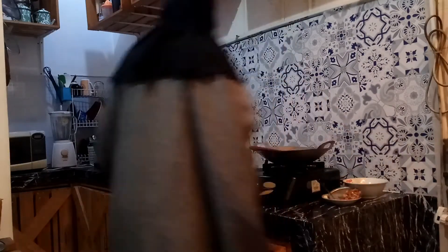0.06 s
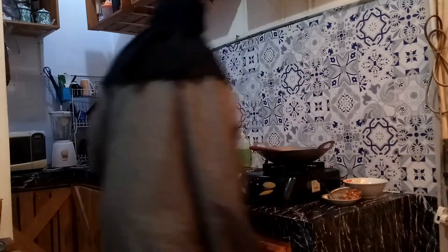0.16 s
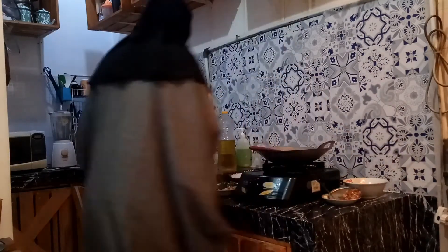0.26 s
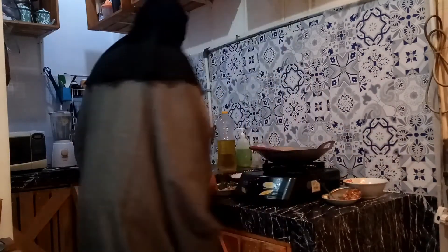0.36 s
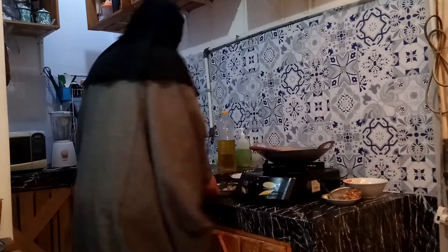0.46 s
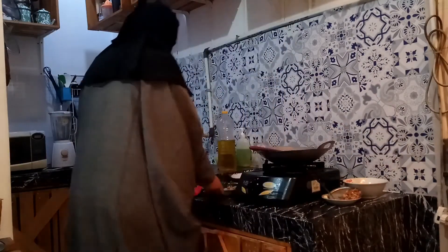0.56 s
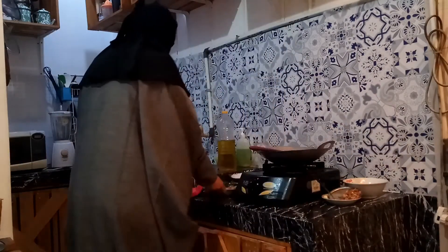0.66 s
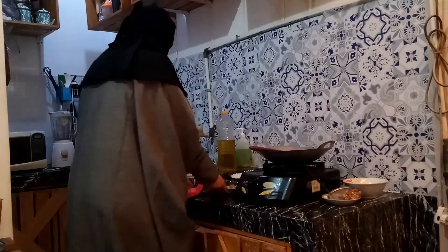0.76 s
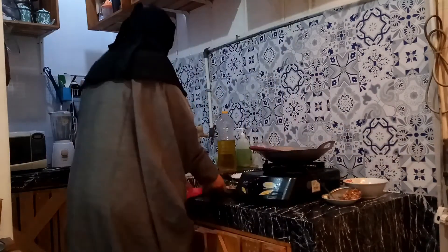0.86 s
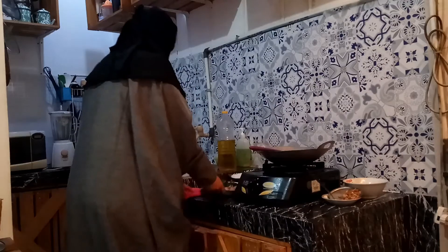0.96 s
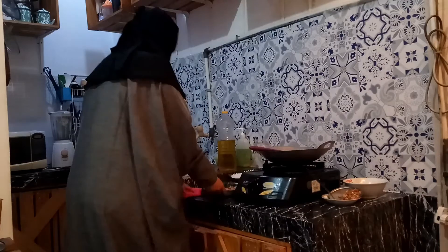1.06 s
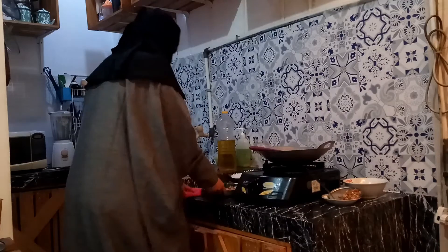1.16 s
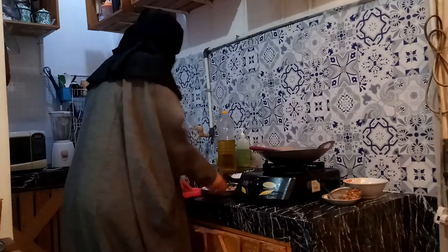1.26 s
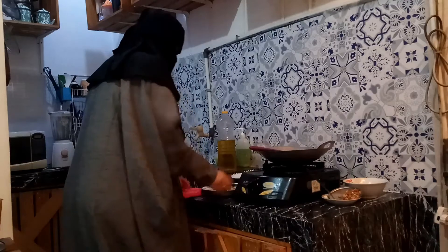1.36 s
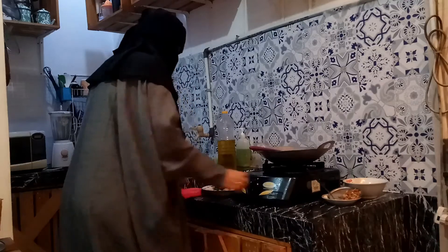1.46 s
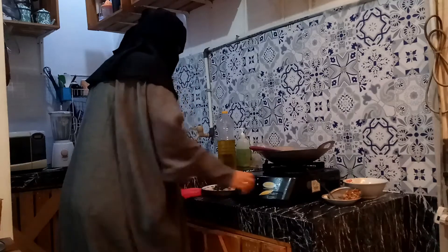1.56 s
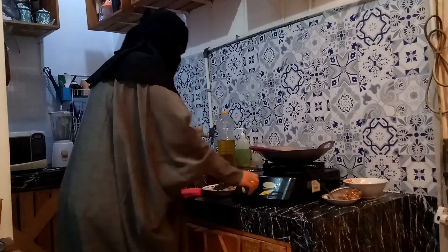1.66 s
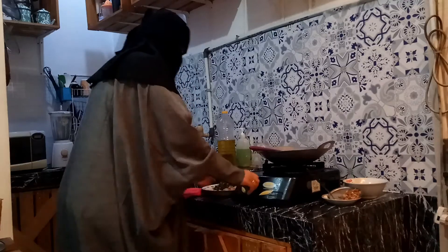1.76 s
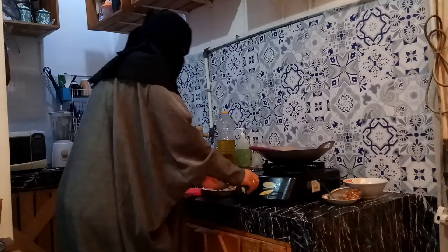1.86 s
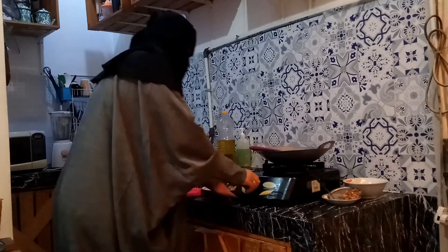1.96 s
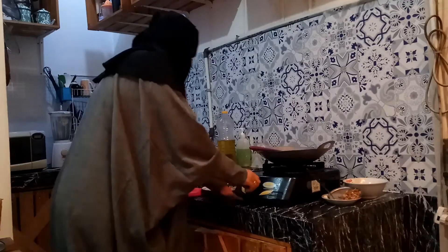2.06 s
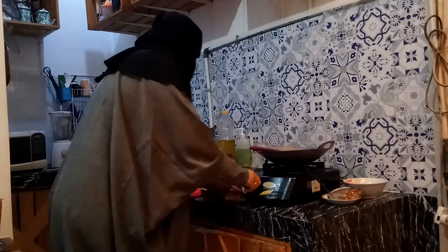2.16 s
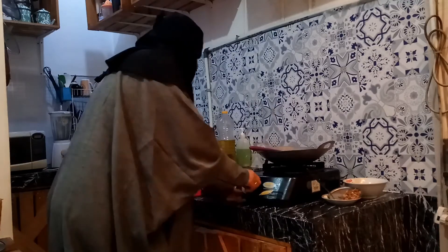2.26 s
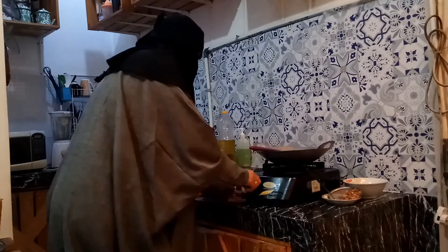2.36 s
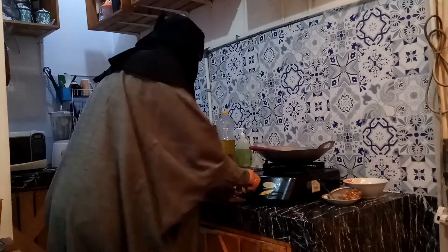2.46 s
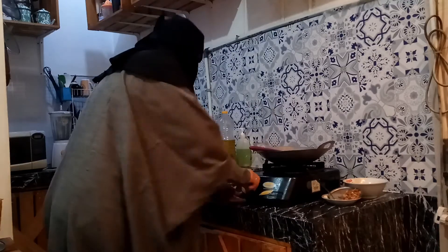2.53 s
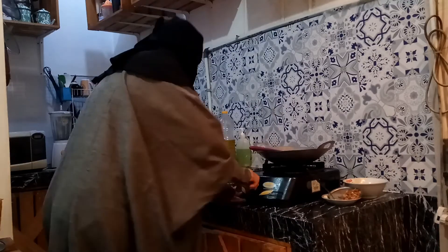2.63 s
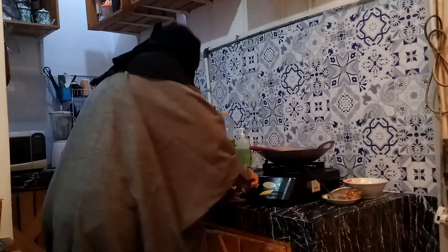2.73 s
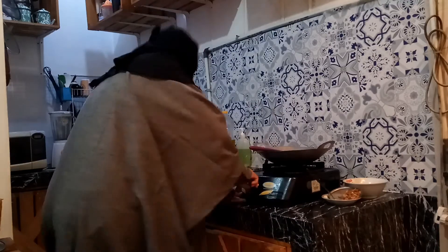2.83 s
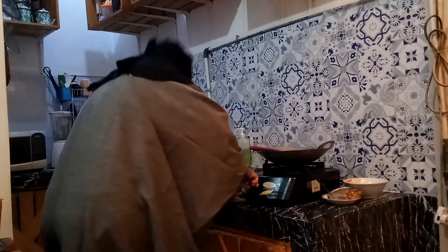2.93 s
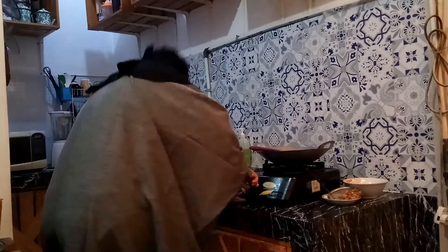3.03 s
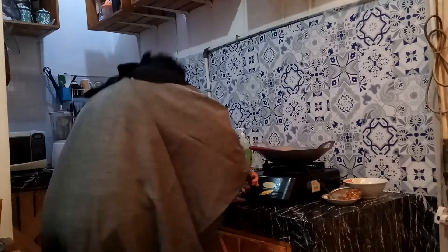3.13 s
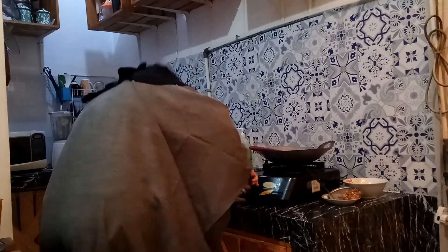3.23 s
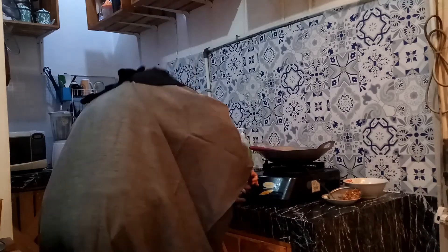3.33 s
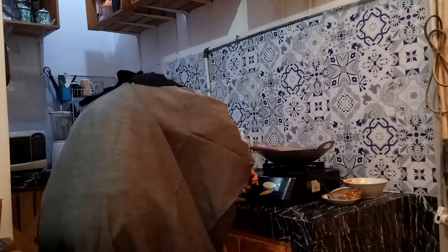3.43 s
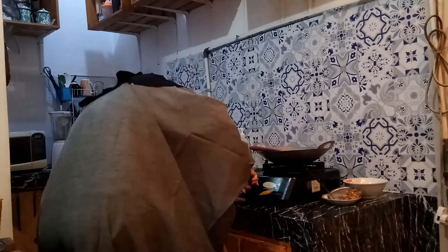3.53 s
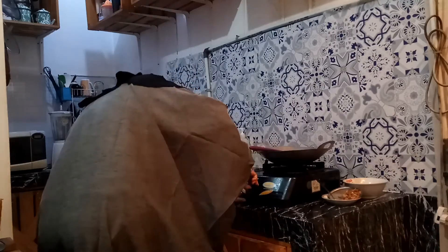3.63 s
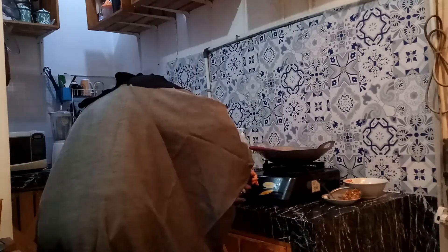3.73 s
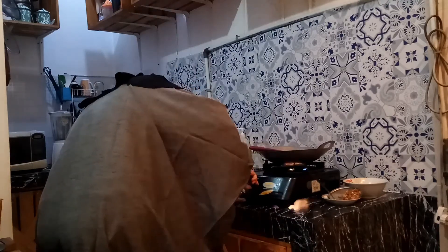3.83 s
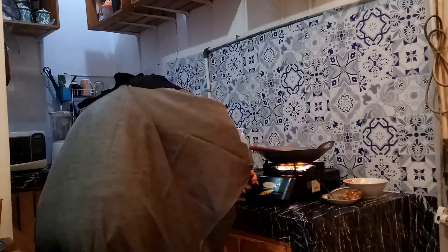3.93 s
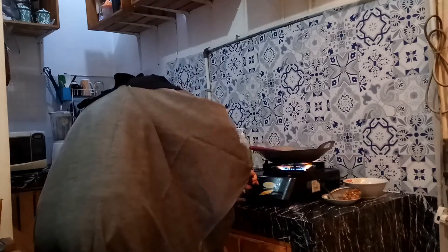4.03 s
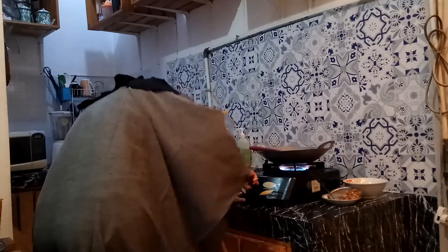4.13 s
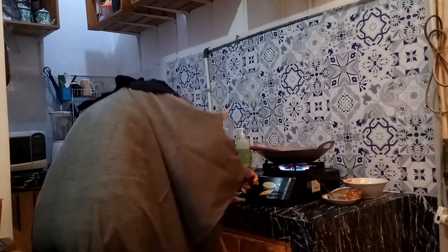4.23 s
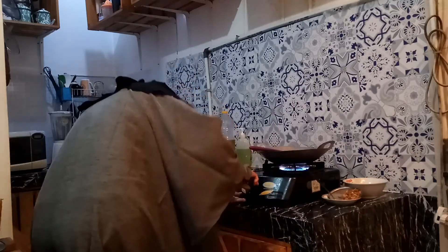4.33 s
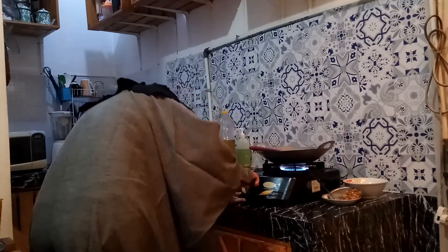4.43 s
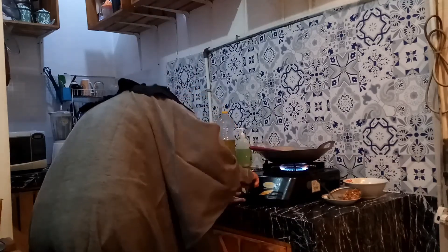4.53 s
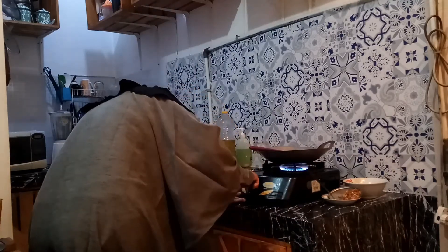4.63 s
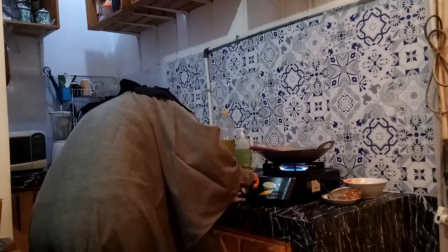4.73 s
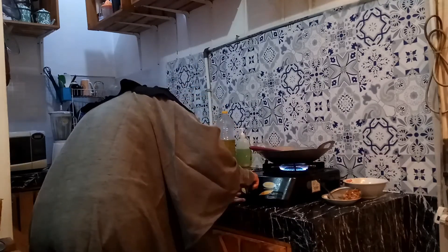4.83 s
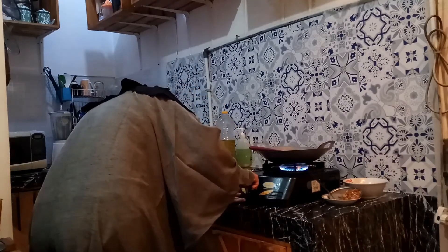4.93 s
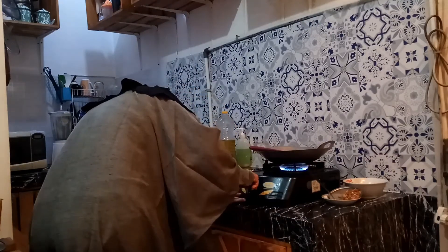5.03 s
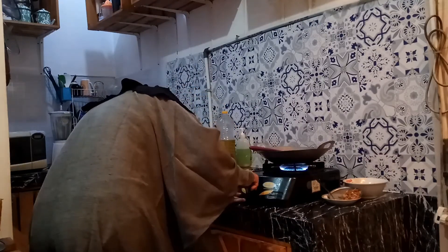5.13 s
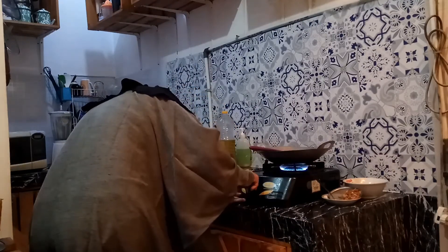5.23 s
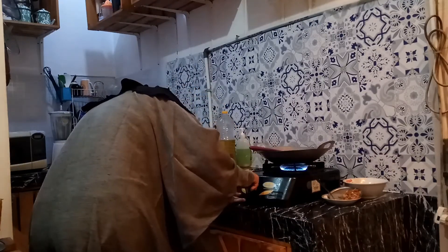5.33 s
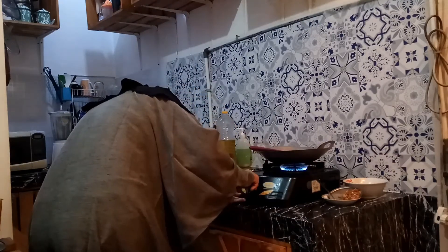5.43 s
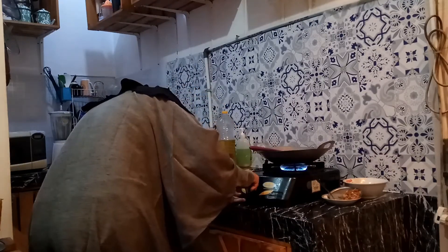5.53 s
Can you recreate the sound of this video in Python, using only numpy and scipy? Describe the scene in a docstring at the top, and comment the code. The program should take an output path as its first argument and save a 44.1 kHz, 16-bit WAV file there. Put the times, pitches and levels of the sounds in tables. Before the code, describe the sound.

In a small tiled kitchen, cloth rustles and a utensil clacks on the counter, then a gas stove igniter snaps loudly and flame puffs alight.

```python
"""A small tiled kitchen, in stereo: a cook steps up to a portable gas stove, cloth rustling as noise strokes.
A utensil clacks on the counter: short force bursts drive resonant bodies.
The knob turns: gas seeps as filtered noise, the igniter snaps, a jet rushes and the flame catches in low puffs.
The knob clicks back and the burner hisses faintly; a thin airy whistle drifts through.
Most of it reaches the two microphones off the tiles, over room rumble, microphone hiss and appliance hum."""
import sys
import numpy as np
from scipy import signal
from scipy.fft import rfft, irfft, next_fast_len
from scipy.io import wavfile
from scipy.ndimage import uniform_filter1d

SR = 44100
rng = np.random.default_rng(int(sys.argv[2]) if len(sys.argv) > 2 else 0)


def put_to_file(sound):
    """Save the sound as 16-bit audio at rate SR, in the file named by the first command-line argument."""
    columns = np.atleast_2d(sound).T  # one column per channel
    safe = np.clip(columns, -1, 1)
    whole_steps = np.round(safe * 32767)
    wavfile.write(sys.argv[1], SR, whole_steps.astype(np.int16))


N = 246166
TIME = np.arange(N) / SR  # s


# Latch slip, then hammer strike and rebounds: t/s, level/dB, contact length/s, brightness f/Hz
IGNITER_SNAPS = [(3.918, -29.5, 0.0016, 6000), (3.9318, 11, 0.0057, 18000), (3.9405, 3, 0.0041, 18000),
                 (3.958, 1.5, 0.011, 12000)]
# Broad colour of the stove when struck: f/Hz, level/dB
STOVE_SPECTRUM = [(80, -31.5), (250, -16.5), (550, -5), (1100, -8), (2300, -3), (3200, -1), (6000, 1),
                  (8500, -2.5), (12500, -7), (16000, -0.5)]


def igniter(ping_hz=14950, ping_width_hz=400, ping_db=-2):
    """The spring hammer hits the spark crystal with a high ping and shakes the steel case."""
    force = contacts(IGNITER_SNAPS, push_s=0.0017)
    case = amp(2.5) * steel_case(force, STOVE_SPECTRUM)
    ping = ring(force, [(ping_hz, ping_width_hz, ping_db)])
    return case + ping


# Sheet-steel resonances: f/Hz, width/Hz, level over the broad colour/dB
STEEL_MODES = [(570, 130, -5.5), (920, 50, 4), (1277, 130, 2.5), (1740, 230, -2), (2870, 300, -1.5),
               (3540, 85, 0), (4100, 300, -4.5), (5810, 64, -11), (6540, 66, -10.5), (10160, 410, -1.5)]
# Narrow notch in everything heard from the steel case: f/Hz, width/Hz, level of the part subtracted/dB
STOVE_NOTCH = [(3700, 100, -3)]


def steel_case(force, spectrum):
    """The stove's sheet steel rings at its modes; one narrow band is weakened."""
    ringing = body(force, spectrum, STEEL_MODES)
    return ringing - ring(ringing, STOVE_NOTCH)


SPARK_S = 3.932  # the jet and the flame are silent until here
# The hiss level drops here; the low burn falls from here, though it is silent until the spark
BURN_FROM_S = 3.7
VALVE_OPEN_S, VALVE_RISE_S = 3.02, 0.13  # the knob is pressed in; rise is the time per 20 dB
UNLIT_HISS_DB, LIT_HISS_DB = -72, -83  # before the common hiss gain
VALVE_FALL_S = 1.1  # fall of each valve whistle, time per 20 dB
# Broad colour of the rushing jet: f/Hz, level/dB
JET_SPECTRUM = [(200, -18.5), (600, -6.5), (1200, -8), (2300, -7), (3000, -3.5), (4500, -1), (6500, -0.5),
                (8500, -7), (12500, -10), (16000, -8.5)]
# Broad colour of the flame: f/Hz, level/dB
FLAME_SPECTRUM = [(30, -19.5), (70, -15.5), (125, -1), (330, -1.5), (480, -3.5), (700, -12), (1000, -17),
                  (3000, -27.5), (16000, -63)]
# Valve whistling while the knob is held in and again as the flame is set:
# t at full level/s, length/s, rise per 20 dB/s, level before the common hiss gain/dB
VALVE_TONES = [(3.116, .85, 2.5, -67), (5.5, .1, 0.9, -62)]
# Narrow resonance of the valve: f/Hz, width/Hz, level/dB
VALVE_RESONANCE = [(7520, 68, 0.0027)]
# Broad resonance of the burner: f/Hz, width/Hz, level/dB
BURNER_RESONANCE = [(5100, 990, -1.5)]


def gas():
    """The jet sputters through the steel burner, the flame catches in low puffs, a thin hiss stays."""
    jet_noise, burn_noise, seep_noise = rng.standard_normal((3, N))
    rush = steel_case(jet_noise * jet_flow() * flutter(350, depth_db=5), JET_SPECTRUM)
    flame = colour(burn_noise * flame_size() * flutter(70, depth_db=-2.0), FLAME_SPECTRUM)

    opening = swell(VALVE_OPEN_S, N / SR, VALVE_RISE_S, VALVE_RISE_S)
    burner_level = amp(np.where(TIME < BURN_FROM_S, UNLIT_HISS_DB, LIT_HISS_DB))
    valve_level = 0
    for s, length_s, rise_s, db in VALVE_TONES:
        valve_level = valve_level + amp(db) * swell(s, length_s, rise_s, VALVE_FALL_S)
    valve = valve_level * ring(seep_noise, VALVE_RESONANCE)
    burner = burner_level * ring(seep_noise, BURNER_RESONANCE)
    hiss = amp(13.5) * opening * (valve + burner)
    return rush + flame + hiss


JET_FULL_S, JET_HOLD_S, JET_DB = 3.997, 0.073, -27.5
JET_RISE_S, JET_FALL_S = 0.095, 0.063  # time per 20 dB
JET_TRAIL_DB, JET_TRAIL_S = -48, 0.26  # last gas leaving the pilot pipe: level, time per 20 dB


def jet_flow():
    """From the spark the jet swells, holds and shuts, leaving a weak trail."""
    main = amp(JET_DB) * swell(JET_FULL_S, JET_HOLD_S, JET_RISE_S, JET_FALL_S)
    trail = amp(JET_TRAIL_DB) * swell(JET_FULL_S, JET_HOLD_S, JET_RISE_S, JET_TRAIL_S)
    return np.hypot(main, trail) * (TIME > SPARK_S)


PUFF_RISE_S, PUFF_FALL_S = 0.11, 0.033  # time per 20 dB
BURN_DB, BURN_FALL_S = -58.5, 1  # level at BURN_FROM_S, time per 20 dB
# Puffs as the flame catches round the burner: t/s, length/s, level/dB
FLAME_PUFFS = [(3.943, .03, -44), (4.086, 0.041, -35.5), (4.247, 0.018, -41)]


def flame_size():
    """A few puffs over a low burn that dies down steadily."""
    puffs = sum(amp(db) * swell(s, length_s, PUFF_RISE_S, PUFF_FALL_S) for s, length_s, db in FLAME_PUFFS)
    burn = amp(BURN_DB) * swell(BURN_FROM_S, 0, PUFF_RISE_S, BURN_FALL_S)
    return (puffs + burn) * (TIME > SPARK_S)


# Clacks and rubs of utensil and knob: t/s, relative level/dB, contact length/s, brightness f/Hz
UTENSIL_AND_KNOB = [(0.899, -12, 0.01, 14400), (2.225, -25, .07, 2100), (2.582, -19.5, 0.014, 3030),
                    (2.655, -26, .025, 6000), (4.402, -17.5, 0.01, 6040)]
# Broad colour of the clacks: f/Hz, level/dB
CLACK_SPECTRUM = [(100, -14), (400, -23.5), (900, -6.5), (1350, -4), (1900, -1), (3200, -6), (6000, -5),
                  (8000, -13), (13000, -9.5), (16000, -28)]
# Resonances in the clacks: f/Hz, width/Hz, level over the broad colour/dB
CLACK_RESONANCES = [(354, 122, 15.5), (1380, 73, -16.5), (2300, 290, -8), (2440, 190, -20), (4060, 87, -7),
                    (6060, 300, -8)]
# Knocks and rubs of counter and stove knob, bright to dull:
# t/s, relative level/dB, contact length/s, brightness f/Hz
COUNTER_AND_KNOB = [(1.08, -23, 0.022, 1800), (1.2487, 3, 0.004, 14300), (2.255, -29, 0.06, 900),
                    (2.59, -21, 0.0081, 5200), (2.621, -18, 0.0055, 680), (4.44, -24.5, 0.013, 704),
                    (4.677, -30.5, 0.019, 2980)]
# Broad colour of the knocks: f/Hz, level/dB
KNOCK_SPECTRUM = [(60, -29), (150, -13.5), (260, -15.5), (370, -7), (550, -3.5), (780, 1), (950, -5.5),
                  (1170, -7), (1500, -5), (1850, -13), (2400, -12), (3100, -22), (5500, -21), (8000, -30.5),
                  (16000, -30.5)]
# Resonances in the knocks: f/Hz, width/Hz, level over the broad colour/dB
KNOCK_RESONANCES = [(343, 67, -5), (417, 19, -3), (590, 96, -3), (890, 100, -2), (1300, 130, -25),
                    (2150, 100, -11), (2430, 97, -4)]
# Soft footfalls: t/s, level/dB
FOOTFALLS = [(0.311, -28.5), (1.059, -26.5), (1.799, -26.5), (2.175, -26.5), (2.49, -25.5), (2.6, -26.5),
             (3.33, -31)]
# Broad colour of the footfalls: f/Hz, level/dB
FOOTFALL_SPECTRUM = [(40, -28), (90, -11), (135, 0.5), (220, -9.5), (400, -3.5), (1500, -48)]
STEP_CONTACT_S, STEP_BRIGHT_HZ = 0.031, 250


def handling():
    """Utensil and knob clack, counter and knob knock, feet thud softly."""
    clack_force = contacts(bouncing(UTENSIL_AND_KNOB, count=3), push_s=0.0022)
    clacks = body(clack_force, CLACK_SPECTRUM, CLACK_RESONANCES)
    knocks = body(contacts(COUNTER_AND_KNOB, push_s=0.0042), KNOCK_SPECTRUM, KNOCK_RESONANCES)
    step_rows = [(s, db, STEP_CONTACT_S, STEP_BRIGHT_HZ) for s, db in FOOTFALLS]
    steps = colour(contacts(step_rows, push_s=0.003), FOOTFALL_SPECTRUM)
    return amp(0.5) * clacks + amp(-1.0) * knocks + steps


# Per bounce: gap, loss and share of brightness kept
REBOUND_S, REBOUND_LOSS_DB, REBOUND_DULLING = 0.028, 5.5, 0.46


def bouncing(rows, count):
    """Each contact comes count times in all, every bounce weaker and duller than the last."""
    return [(s + k * REBOUND_S, db - k * REBOUND_LOSS_DB, length_s, bright_hz * REBOUND_DULLING ** k)
            for s, db, length_s, bright_hz in rows for k in range(count)]


def contacts(rows, push_s):
    """Short contacts are a sharp push, long ones a chattering rub; soft contacts are duller."""
    force = np.zeros(N)
    t = TIME[:SR // 5]
    for s, db, length_s, bright_hz in rows:
        chatter = rng.standard_normal(len(t)) * np.exp(-t / length_s)
        blow = chatter / np.linalg.norm(chatter)
        blow[0] += push_s / length_s
        softness = signal.butter(2, min(bright_hz, 0.45 * SR), fs=SR, output="sos")
        at = round(s * SR)
        force[at:at + len(t)] += amp(db) * signal.sosfilt(softness, even(blow, width_hz=10))
    return force


# Strokes of sleeve and robe: t at full speed/s, length/s, rub level/dB, fine swish level/dB
CLOTH_STROKES = [(0.157, 0.095, -62.5, -67.5), (0.313, .03, -44, -52), (0.447, .07, -54, -57),
                 (0.589, 0.24, -59, -62), (1.511, 0.01, -62.5, -68), (1.774, 0.16, -70, -60.5),
                 (1.918, 0.021, -50.5, -56.5), (3.008, .115, -64.5, -68.5)]
# Broad colour of the coarse rub: f/Hz, level/dB
RUB_SPECTRUM = [(150, -34), (500, -61.5), (850, -5), (1300, -17.5), (2100, -2.5), (2900, -2), (6200, 0.5),
                (8500, -11), (16000, -19)]
# Broad colour of the fine swish: f/Hz, level/dB
SWISH_SPECTRUM = [(1000, -13), (4000, -10), (7500, -9), (10500, 0.5), (13500, -4), (16000, -4)]
STROKE_RISE_S, STROKE_FALL_S = 0.077, 0.06  # time per 20 dB
RUB_REST_DB = -93.5  # the robe never hangs quite still


def cloth():
    """Threads catch and slip in uneven bursts under each stroke: a coarse rub and a finer swish."""
    rub, swish = amp(RUB_REST_DB), 0
    for s, length_s, rub_db, swish_db in CLOTH_STROKES:
        speed = swell(s, length_s, STROKE_RISE_S, STROKE_FALL_S)
        rub = np.hypot(rub, amp(rub_db) * speed)
        swish = np.hypot(swish, amp(swish_db) * speed)
    threads = rng.standard_normal((2, N))
    catching = flutter(220, depth_db=5.5) * flutter(45, depth_db=2.5)
    coarse, fine = threads * catching
    return colour(coarse * rub, RUB_SPECTRUM) + colour(fine * swish, SWISH_SPECTRUM)


# Drifting centre of the faint airy whistle: t/s, f/Hz
WHISTLE_DRIFT = [(1.1, 2430), (2.15, 2700), (2.8, 2360), (3.05, 2671), (3.8, 2700), (4.7, 2620),
                 (5.58, 2740)]
WHISTLE_FULL_S, WHISTLE_HOLD_S, WHISTLE_DB = 1.7, 1.3, -78.5
WHISTLE_FADE_S = 3.2  # time per 20 dB, in and out


def whistle(width_hz=130):
    """A narrow band of noise whose centre drifts; it fades slowly in and out."""
    narrow = signal.butter(2, width_hz, fs=SR, output="sos")
    wobble = signal.sosfilt(narrow, rng.standard_normal((2, N)))
    pitch_hz = np.interp(TIME, *np.transpose(WHISTLE_DRIFT))
    phase = 2 * np.pi * np.cumsum(pitch_hz) / SR
    level = amp(WHISTLE_DB) * swell(WHISTLE_FULL_S, WHISTLE_HOLD_S, WHISTLE_FADE_S, WHISTLE_FADE_S)
    return level * (wobble[0] * np.cos(phase) + wobble[1] * np.sin(phase)) / np.std(wobble)


# Reverberation of the tiled kitchen: f/Hz, time to fall 60 dB/s
TILE_DECAY = [(100, 0.61), (500, 0.37), (850, 0.38), (1500, 0.44), (4000, 0.41), (9000, 0.36),
              (15000, 0.18)]


def kitchen(x, direct_db=-13, early_db=-6, early_s=0.024):
    """The cook shields the stove, so most sound comes off the tiles: close reflections, then a banded tail."""
    t = TIME[:SR * 3 // 4]
    field = rfft(diffuse(len(t)))
    hz = np.fft.rfftfreq(len(t), 1 / SR)
    centres = np.geomspace(100, 16000, 9)
    tail = 0
    for centre, share in zip(centres, np.eye(len(centres))):
        # overlapping triangular bands that add up to one
        band = irfft(field * at_hz(np.c_[centres, share], hz), len(t))
        tail = tail + band * amp(-60 * t / at_hz(TILE_DECAY, centre))
    early = diffuse(len(t)) * np.exp(-t / early_s)
    response = tail / np.linalg.norm(tail[0]) + amp(early_db) * early / np.linalg.norm(early[0])
    response[:, 0] += amp(direct_db)
    return signal.fftconvolve(x, even(response, width_hz=31.0), axes=1)[:, :N]


# Likeness of the two microphones in a diffuse field: f/Hz, left-right correlation
FIELD_CORRELATION = [(30, 0.18), (70, 0.95), (150, 0.94), (300, 0.75), (600, .55), (1200, -0.24),
                     (3000, 0.021), (16000, -0.048)]


def diffuse(size):
    """White noise from all sides: much alike at both microphones in the bass, unlike in the treble."""
    mid, side = rfft(rng.standard_normal((2, size)))
    alike = np.clip(at_hz(FIELD_CORRELATION, np.fft.rfftfreq(size, 1 / SR)), -0.99, 0.99)
    shared = np.sqrt((1 + alike) / 2) * mid
    opposed = np.sqrt((1 - alike) / 2) * side * [[1], [-1]]
    return irfft(shared + opposed, size)


# Broad colour of room rumble and microphone hiss: f/Hz, level/dB
ROOM_SPECTRUM = [(25, -12), (55, -7.5), (115, -2.5), (170, -2.5), (280, -7), (500, -9.5), (1300, -12.5),
                 (2500, -13.5), (3300, -18), (7000, -21.5), (8500, -30.5), (13500, -26.5), (14700, -20.5),
                 (16000, -16)]
# The right microphone hisses more at the top: f/Hz, left minus right level/dB
MIC_HISS_BALANCE = [(100, 2.5), (12000, -1), (14500, -9)]
# Hum of appliances: f/Hz, level/dB
APPLIANCE_HUM = [(110, -75.5), (134, -89.5), (270, -81.5), (334, -84)]
ROOM_DB = -65


def background():
    """Room rumble, microphone hiss and a wavering appliance hum."""
    air = amp(ROOM_DB) * lean(colour(diffuse(N), ROOM_SPECTRUM), MIC_HISS_BALANCE)
    hum = 0
    for hz, db in APPLIANCE_HUM:
        tone = np.sqrt(2) * np.sin(2 * np.pi * hz * TIME)
        hum = hum + amp(db) * tone * flutter(13, depth_db=3.5)
    return air + hum


def amp(db):
    """Decibels to gain."""
    return 10 ** (np.asarray(db) / 20)


def at_hz(points, hz):
    """Read a table on a log-frequency axis."""
    f, value = np.transpose(points)
    return np.interp(np.log(np.maximum(hz, 1)), np.log(f), value)


def colour(x, spectrum):
    """Causal (minimum-phase) filter with the given spectrum; white noise keeps its power."""
    size = 4096
    gain = amp(at_hz(spectrum, np.fft.rfftfreq(size, 1 / SR)))
    cepstrum = irfft(np.log(gain / np.sqrt(np.mean(gain ** 2))))[:size // 2]
    cepstrum[1:] *= 2  # folding the cepstrum makes the phase minimal
    response = irfft(np.exp(rfft(cepstrum, size)))
    return signal.fftconvolve(np.atleast_2d(x), response[None], axes=1)[:, :N]


def ring(x, modes):
    """Parallel two-pole resonances."""
    out = 0
    for hz, width_hz, db in modes:
        r = np.exp(-np.pi * width_hz / SR)
        zeros = [(1 - r * r) / 2, 0, (r * r - 1) / 2]
        poles = [1, -2 * r * np.cos(2 * np.pi * hz / SR), r * r]
        out = out + amp(db) * signal.lfilter(zeros, poles, x + 1e-18)
    return out


def body(force, spectrum, modes):
    """An object answers with a broad colour and a few modes that stand out of it."""
    broad = colour(force, spectrum)
    return broad + ring(broad, modes)


def lean(x, balance):
    """Tilt each frequency to the left or right."""
    size = next_fast_len(N + SR // 10)
    db = at_hz(balance, np.fft.rfftfreq(size, 1 / SR))
    return irfft(rfft(x, size) * amp(db * [[0.5], [-0.5]]), size)[:, :N]


def flutter(per_s, depth_db):
    """A gain that wanders between random decibel values, per_s of them each second."""
    knots = np.arange(0, 6, 1 / per_s)
    values = rng.standard_normal(8192)[:len(knots)]
    return amp(depth_db * np.interp(TIME, knots, values))


def swell(start, hold, rise_s, fall_s):
    """Gain that rises to 1 at the start, holds, and falls; rise and fall are times per 20 dB."""
    early = np.maximum(start - TIME, 0)
    late = np.maximum(TIME - start - hold, 0)
    return amp(-20 * np.minimum(early / rise_s + late / fall_s, 10))


def even(x, width_hz):
    """Level out the chance humps in a burst's spectrum and set its first channel to unit energy."""
    size = x.shape[-1]
    spectrum = rfft(x, 2 * size)
    power = np.mean(np.abs(np.atleast_2d(spectrum)) ** 2, axis=0)
    smooth = uniform_filter1d(power, max(1, int(width_hz * 2 * size / SR)))
    out = irfft(spectrum / np.sqrt(np.abs(smooth) + 1e-18))[..., :size]
    return out / np.linalg.norm(np.atleast_2d(out)[0])


def scene():
    """Everything at the counter is heard through the room."""
    counter = cloth() + handling() + igniter() + gas() + whistle()
    return kitchen(counter) + background()


# Resonance of the microphone ports: f/Hz, width/Hz, level/dB
PORT_RESONANCE = [(15800, 1870, 11.5)]
# Balance of the two microphones: f/Hz, left minus right level/dB
MIC_BALANCE = [(100, 0.5), (1200, -1), (4000, -1.5), (6500, -1), (9500, 3.5), (12500, 3), (15000, -4.5)]
CUTOFF_HZ = 15550


def record(dry):
    """Two slightly unlike microphones whose ports ring at the very top; steep low-pass."""
    heard = lean(dry + ring(dry, PORT_RESONANCE), MIC_BALANCE)
    low_pass = signal.ellip(12, 0.1, 80, CUTOFF_HZ, fs=SR, output="sos")
    return signal.sosfilt(low_pass, heard)


dry = scene()
out = record(dry)
put_to_file(out)
```